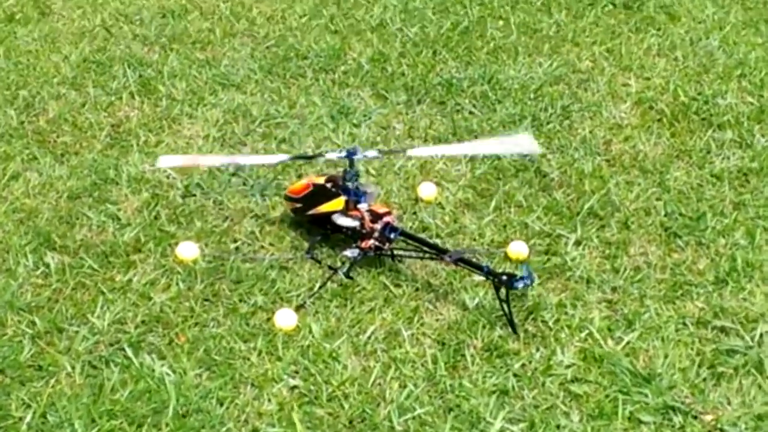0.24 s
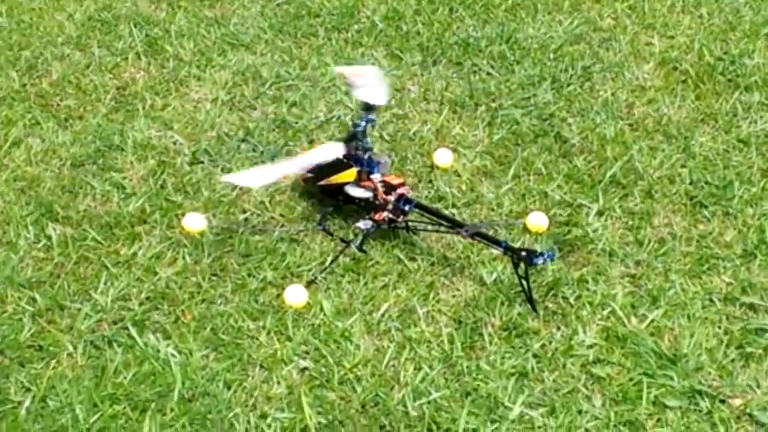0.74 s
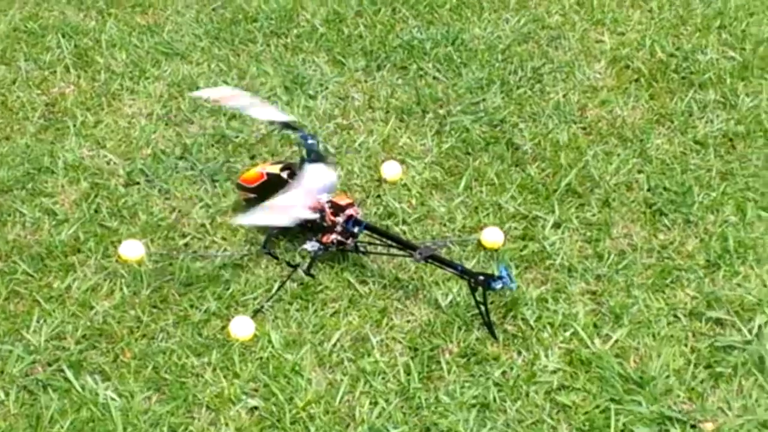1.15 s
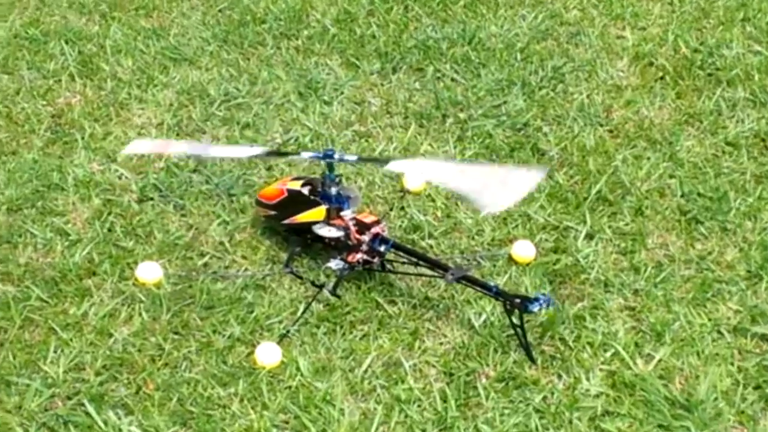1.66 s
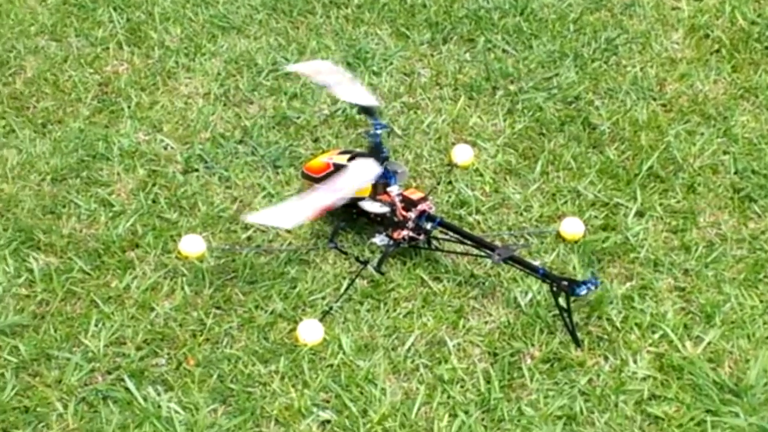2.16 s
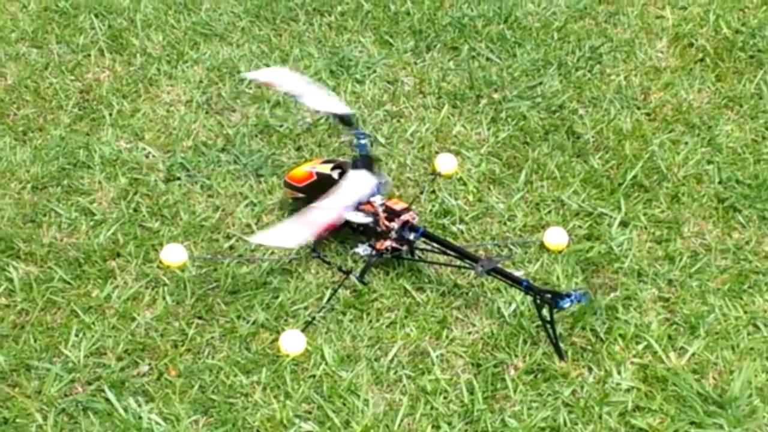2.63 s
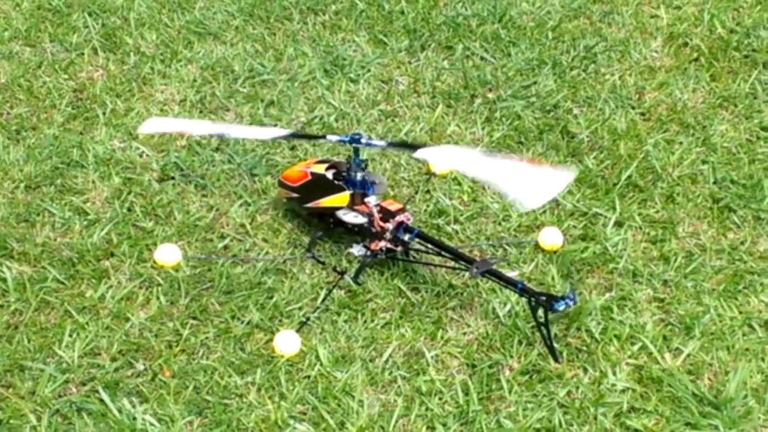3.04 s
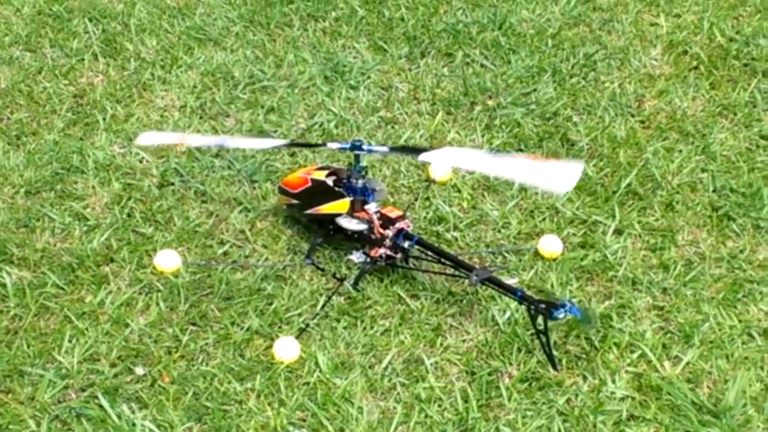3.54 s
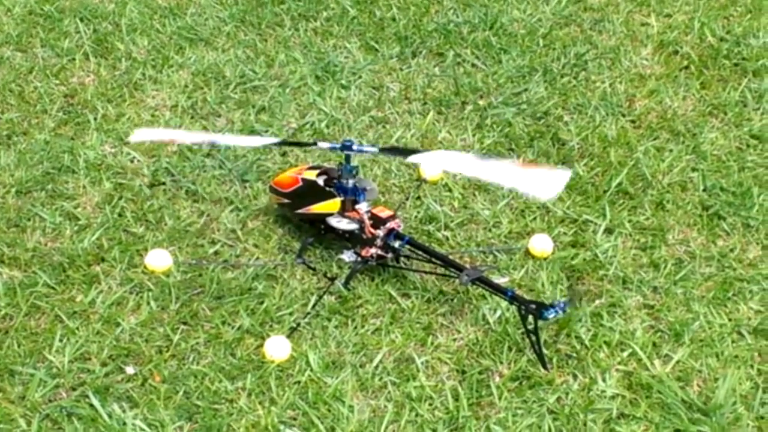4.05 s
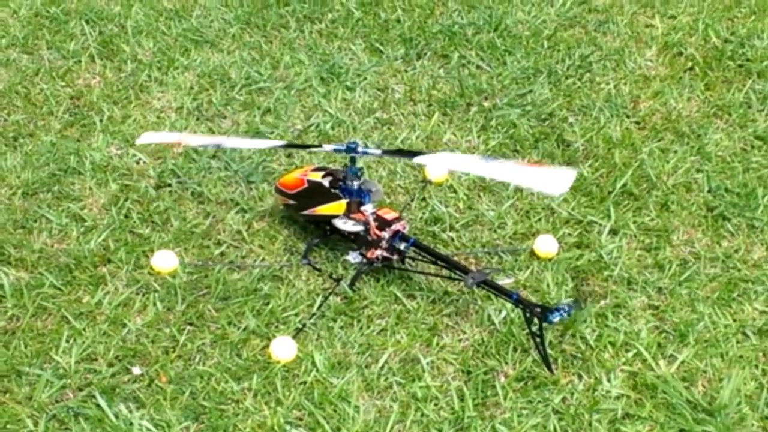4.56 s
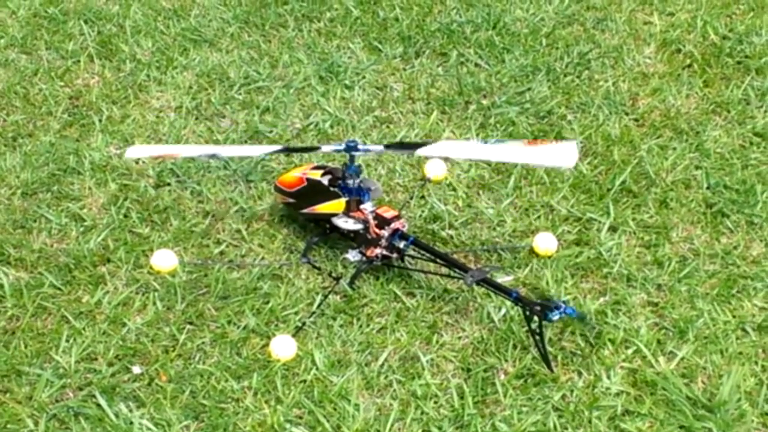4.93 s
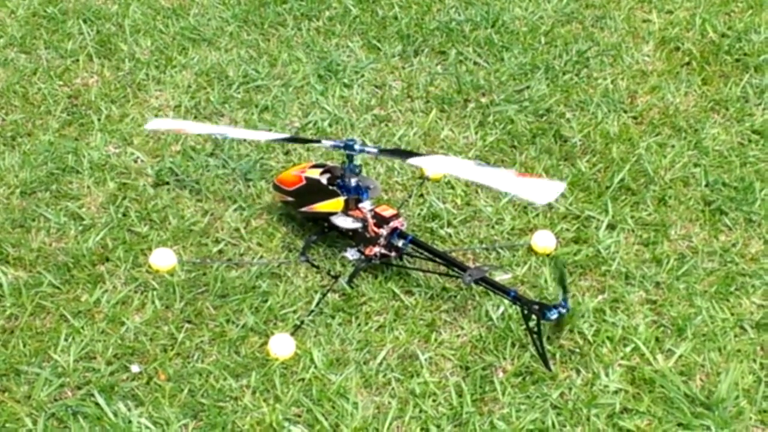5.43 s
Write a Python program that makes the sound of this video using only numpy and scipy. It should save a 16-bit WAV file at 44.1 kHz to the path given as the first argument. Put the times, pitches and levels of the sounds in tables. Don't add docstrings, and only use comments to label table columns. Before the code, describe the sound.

Close outdoors, a model helicopter winds down: piercing whine and hissing rattle, then loose gear knocks slowing to faint clicks over outdoor hush.

```python
import sys
import numpy as np
from scipy import signal
from scipy.fft import rfft, irfft, next_fast_len
from scipy.io import wavfile
from scipy.ndimage import uniform_filter1d, map_coordinates

SR = 44100
rng = np.random.default_rng(int(sys.argv[2]) if len(sys.argv) > 2 else 0)


def pcm_store(signal):
    levels = np.round(np.clip(np.atleast_2d(signal), -1, 1) * 32767)
    wavfile.write(sys.argv[1], SR, levels.astype(np.int16).T)


def level_to_linear(level):
    exponent = np.asarray(level, float) / 20
    return 10 ** exponent


N = 250796
TIME_S = np.arange(N) / SR
ROTOR = 13 / 150
LET_GO_S, SILENT_S = 2.6, 3.1


def unit(x):
    return x / np.sqrt(np.mean(x ** 2) + 1e-20)


def steady(x):
    power = uniform_filter1d((x ** 2).mean(0), size=7000)
    return x / np.sqrt(np.abs(power) + 1e-12)


def along(points, hz):
    f, v = np.transpose(points)
    return np.interp(np.log(hz + 1), np.log(f + 1), v)


def curves(rows):
    s, *cols = np.transpose(rows)
    return [np.interp(TIME_S, s, c) for c in cols]


def swells(rows):
    s, half, *db = np.transpose(rows)
    coarse = np.arange(0, N + 64, 32)
    bells = np.exp(-((coarse / SR - s[:, None]) / half[:, None]) ** 2)
    return [np.interp(np.arange(N), coarse, column @ bells) for column in db]


def wobble(rate):
    coarse = np.arange(0, N + 32, 16)
    knots = rng.standard_normal(int(N * rate / SR) + 4)
    return np.interp(np.arange(N), coarse, map_coordinates(knots, [coarse * rate / SR]))


def cycle(turns, per_turn, phase):
    return np.cos(2 * np.pi * per_turn * ROTOR * turns + phase)


def filtered(x, response):
    m = next_fast_len(N + 8192)
    return irfft(rfft(x, m) * response(np.fft.rfftfreq(m, 1 / SR)), m)[..., :N]


def band(hz, lo_hz, hi_hz):
    log_hz = np.log(hz + 1)
    below = np.logaddexp(0, 40 * (np.log(lo_hz) - log_hz))
    above = np.logaddexp(0, 40 * (log_hz - np.log(hi_hz)))
    return level_to_linear(-4.343 * (below + above))


def patchy(patchy_db, size=6):
    z = signal.stft(rng.standard_normal((2, N + 512)), nperseg=512)[2]
    field = uniform_filter1d(rng.standard_normal(z.shape[1:]), size=size, axis=0)
    field = uniform_filter1d(field, size=12, axis=1)
    return signal.istft(z * level_to_linear(patchy_db * unit(field)), nperseg=512)[1][:, :N]


# [freq_hz, likeness_0_1]
ALIKE = [(60, 0.71), (250, 0.99), (700, 0.95), (1400, 0.81), (2800, 0.63), (4500, 0.31), (6500, 0.68),
         (9500, 0.8), (13000, 0.24)]
# [freq_hz, left_minus_right_db]
TILT = [(60, -5), (110, 0), (200, -1.5), (380, -2), (700, -2.5), (1290, 0.5), (2380, -0.5), (4400, 2.5),
        (8120, 2.5), (15000, -0.5)]


def stereo(pair, colour):
    m = next_fast_len(N + 8192)
    hz = np.fft.rfftfreq(m, 1 / SR)
    turn = np.arccos(along(ALIKE, hz)) / 2
    mid, side = rfft(pair, m) * colour(hz) * [np.cos(turn), np.sin(turn)]
    balance = level_to_linear(np.outer([.5, -.5], along(TILT, hz)))
    out = irfft([mid + side, mid - side] * balance, m)[:, :N]
    return out / np.std(out.mean(0))


# [time_s, speed_turns_per_s]
SPEED = [(0, 380.8), (.2, 378), (.6, 373.3), (1.2, 367), (1.4, 364.5), (1.6, 360.5), (1.8, 355.8),
         (2, 348.7), (2.6, 326.9), (2.8, 318.3), (3.07, 305), (3.3, 278), (3.78, 241), (4.75, 185),
         (5.05, 165), (5.7, 98)]


def shaft():
    return np.cumsum(curves(SPEED)[0]) / SR


# [time_s, level_db, left_minus_right_db, left_lead_rad]
WHINE = [(0, -34.4, 4.5, .5), (.3, -29.9, 5.3, .45), (.85, -29.8, 5.3, .75), (1.2, -28.6, 7.5, .7),
         (1.35, -30.1, 14.5, .85), (1.55, -32.3, 12, 1.55), (1.8, -34.4, 10, 1.62), (1.97, -40, 7.5, 1.62),
         (2.15, -52, 3.5, 1.5), (2.35, -45, 2, 1), (2.85, -49, 0, .8), (3.2, -95, 0, .8)]


def whine(turns):
    db, pan_db, lead_rad = curves(WHINE)
    depth = .51 + .07 * wobble(6)
    swell = 1 + depth * cycle(turns, 1, -2.1 + .45 * wobble(25)) + .1 * cycle(turns, 2, 1.8)
    phase = 2 * np.pi * 13 * turns + .2 * wobble(40) + .25 * wobble(300)
    flutter = level_to_linear(.4 * wobble(14) + 1.2 * wobble(110))
    side = np.array([[.5], [-.5]])
    pair = level_to_linear(side * pan_db) * np.exp(1j * side * lead_rad)
    pair = pair / np.abs(pair.mean(0))
    return np.sqrt(2) * level_to_linear(db + 0.7) * flutter * swell * np.imag(pair * np.exp(1j * phase))


# [freq_hz, width_hz, gain_db]
LIFTS = [(590, 11, 17), (710, 40, 5), (875, 30, 6), (4790, 170, 17), (950, 90, 7), (2930, 250, 4),
         (5860, 200, 5), (6430, 200, 9)]


def lift(hz):
    grid = np.arange(0, 12000, 2.)
    gain = 1 + sum((level_to_linear(2 * db) - 1) / (1 + ((grid - c) * 2 / w) ** 4) for c, w, db in LIFTS)
    return np.interp(hz, grid, 10 * np.log10(gain))


# [multiple_of_shaft_speed, start_level_db, slope_db_per_s]
TONES = [(.347, -67, 0), (.433, -57, -1), (.52, -61, -1), (.607, -68, 3.8), (.693, -64, 0),
         (.735, -54.5, 0), (1.47, -52, -2), (1.56, -63, 3), (2, -66, 4), (2.37, -59, -1.5), (3.02, -62, 1),
         (4, -49.5, -2), (4.04, -54, -.5), (4.16, -61, .7), (8, -45.5, 0), (9.19, -33, -11), (14, -56, 1.5),
         (18, -57, .5), (30, -39, -24)]


def tones(turns):
    rotor_lasts_s, gone_db = .45, -72
    out, n = np.zeros((2, N)), int((SILENT_S + rotor_lasts_s) * SR)
    t, speed, turns = TIME_S[:n], curves(SPEED)[0][:n], turns[:n]
    beat_db = 2.5 * cycle(turns, 1, -1)
    for multiple, db, db_per_s in TONES:
        fade_s = SILENT_S + rotor_lasts_s * (multiple < 1) - LET_GO_S
        gone = np.clip((t - LET_GO_S) / fade_s, 0, 1)
        driven_db = db + db_per_s * t + lift(multiple * speed) + beat_db * (multiple > 3.5)
        waver_db = (1.6 + 1.6 * (multiple < 3.5)) * wobble(14)[:n]
        level = (gone < 1) * level_to_linear(driven_db + gone * (gone_db - driven_db) + waver_db)
        jitter = (.3 + .4 * (multiple < 4.1)) * wobble(25)[:n]
        phase = 2 * np.pi * (multiple * turns + rng.random()) + jitter
        lead = 0.13 * multiple ** .5 * rng.normal(size=2)[:, None]
        out[:, :n] += np.sqrt(2) * level * level_to_linear(2.8 * lead) * np.sin(phase + lead)
    return out


# [time_s, level_db]
COAST = [(3.8, -90), (4.2, -75), (5, -78), (5.3, -74), (5.45, -74), (5.6, -90)]


def coast(turns):
    level = level_to_linear(curves(COAST)[0] + 2.5 * wobble(12))
    return np.sqrt(2) * level * np.sin(2 * np.pi * 8 * turns + .4 * wobble(25))


def ticking(turns):
    speed = curves(SPEED)[0]
    per_s = speed * (.6 + 2.5 * (speed / 380) ** 4)
    count = np.cumsum(per_s * level_to_linear(1.8 * wobble(90))) / SR
    at = np.flatnonzero(np.diff(np.floor(count)))
    hits = np.zeros(N)
    hits[at] = level_to_linear(2.2 * rng.standard_normal(len(at)) + cycle(turns[at], 1, .2))
    return hits


def binding(turns):
    bind_s, free_s, width_turns, swell_db = 3.215, 4.4, 0.5, 2
    away = (ROTOR * (turns - turns[round(bind_s * SR)]) + .5) % 1 - .5
    touching = (TIME_S > bind_s - .02) * (TIME_S < free_s)
    return swell_db * (np.exp(-(away / width_turns) ** 2) - .5) * touching


# [time_s, rattle_db, backlash_0_1, wash_db]
DRIVE = [(0, -33, 0.02, -45), (.12, -34.5, 0, -44.5), (.6, -36.5, 0, -46), (1.2, -35, 0.29, -47.5),
         (1.6, -32, 0.24, -43), (2.1, -30, 0.48, -43), (2.45, -28.5, 0.6, -45), (2.75, -32, 0.32, -44.5),
         (3.0, -32.5, 0.45, -46), (3.38, -42.5, 0.35, -48), (3.63, -40, 0.55, -45.5),
         (3.85, -45, 0.53, -53), (4.05, -49.5, 0.62, -57), (4.38, -50, 0.49, -61),
         (4.75, -54.5, 0.58, -65.5), (5.3, -65, 0.6, -62), (5.69, -64.5, 0, -62.5)]
# [time_s, half_length_s, rattle_swell_db, tip_hiss_swell_db]
JOLTS = [(.9, 0.22, 3, 4.5), (1.27, 0.031, 1.5, 4), (1.57, 0.049, 0.5, 3), (1.93, 0.076, 1.5, 4),
         (2.12, 0.045, 0, 5), (2.85, 0.088, 0.5, -3), (3.41, 0.022, -0.5, -14), (3.658, 0.038, -5.5, -6),
         (3.705, 0.061, 2.5, 4), (3.768, .012, -3, 0), (3.785, 0.01, 5, 3), (4.09, 0.019, -5.5, -9),
         (4.13, .02, 0, 7), (4.26, 0.0097, -7, -7), (4.424, 0.086, 1.5, 7.5), (4.556, 0.0053, 6, 13),
         (4.689, 0.034, 7, 4), (5.13, 0.068, 2.5, 7)]
# [time_s, half_length_s, low_part_db, high_part_db, high_hum_db]
BUZZ = [
    (3.58, 0.22, 3, -1, -4.5),
    (1.06, 1, -1, 3, 2.5),
    (2.78, .25, -3, 2, 2),
]
# [freq_hz, density_db_per_hz]
FRAME = [(1940, -59), (3300, -31), (3430, -42), (3590, -10.5), (3760, -13), (4400, -5.5), (5840, -3),
         (6400, 6.5), (6970, 9), (8320, 1.5), (9300, 7), (10600, 4.5), (11300, 1), (13700, 0), (15800, 7)]
# [freq_hz, density_db_per_hz]
BODY = [(680, -12), (1150, 8), (1270, 1.5), (1590, 1), (2170, 6.5), (2380, 1), (2730, 16), (3060, 13),
        (3330, 11.5), (3500, 22.5), (4550, -44), (7700, -120)]
# [freq_hz, width_hz, gain_db]
RINGS = [(4810, 130, 11.5), (5860, 330, 4.5), (6450, 350, 2), (6900, 330, 5.5), (7460, 330, -1)]


def rattle(turns):
    db, loose, _ = curves(DRIVE)
    jolt_db = swells(JOLTS)[0]
    buzz_low_db, buzz_high_db, _ = swells(BUZZ)
    top_db = -6 - 2.9 * loose + 0.032 * jolt_db
    canopy_db = -9.5 - 12.2 * loose + 0.032 * jolt_db
    middle_db = -7 - 8.5 * loose + 0.032 * jolt_db
    db = db + 0.62 * wobble(9.74) + binding(turns) + jolt_db
    tick_share = np.clip(1.25 - curves(SPEED)[0] / 400, .3, .7)
    hits, t = ticking(turns), TIME_S[:400]
    burst = (1 - np.exp(-t / 0.00029)) * np.exp(-t / 0.0028)
    bursts = unit(signal.fftconvolve(hits, burst)[:N])
    turning = level_to_linear(.7 * cycle(turns, 1, .2) + .5 * cycle(turns, 2, 1.6))
    push = np.sqrt(1 - tick_share) * turning + 0.94 * np.sqrt(tick_share) * bursts
    drive = steady(patchy(patchy_db=1.34) * push)
    parts = [(FRAME, 5250, 8300, 0), (FRAME, 8300, 11300, top_db), (FRAME, 3450, 5250, middle_db + 4),
             (BODY, 1200, 2450, canopy_db + buzz_low_db), (BODY, 2450, 3450, canopy_db + buzz_high_db)]
    hiss = []
    for shape, lo_hz, hi_hz, rel_db in parts:
        noise = stereo(drive, lambda hz: level_to_linear(along(shape, hz)) * band(hz, lo_hz, hi_hz))
        hiss.append(level_to_linear(db + rel_db + 0.037 * wobble(4.1)) * noise)
    rung = np.zeros(N)
    for c, w, gain_db in RINGS:
        blows = hits * level_to_linear(4.6 * rng.standard_normal(N))
        rung += filtered(blows, lambda f: level_to_linear(gain_db) * 1j * f * w / (c * c - f * f + 1j * f * w))
    rung = steady(filtered(rung, lambda hz: band(hz, 5080, 6530))[None]) * level_to_linear([[1], [-1]])
    chatter_db = -0.5 * np.clip((TIME_S - SILENT_S) / 0.11, 0, 1)
    ticks = np.sqrt(tick_share) * level_to_linear(db + chatter_db) * rung
    return sum(hiss[1:]) + np.sqrt(1 - tick_share) * hiss[0] + ticks


# [start_s, peak_db, ring_hz]
KNOCKS = [(3.1043, -25, 5450), (3.1302, -29, 7000), (3.1402, -32, 6660), (3.1438, -27, 6100),
          (3.1748, -28, 6060), (3.1788, -20, 5900), (3.1981, -20, 5540), (3.2048, -25, 5500),
          (3.2084, -34, 6930), (3.2175, -27, 6000), (3.2619, -25, 5500), (3.3029, -28, 5640),
          (3.3101, -27, 5130), (3.3324, -38, 6900), (3.3363, -22, 6170), (3.3412, -21, 5700),
          (3.3447, -25, 5900), (3.3797, -36, 5920), (3.3862, -26, 5340), (3.4276, -23, 5370),
          (3.4323, -25, 5940), (3.4389, -35, 5990), (3.4653, -30, 5900), (3.4729, -30, 6400),
          (3.4968, -26, 6360), (3.5087, -36, 5100), (3.5148, -32, 5140), (3.5397, -45, 6800),
          (3.5446, -27, 6800), (3.5519, -36, 6500), (3.5557, -28, 6000), (3.5611, -31, 6300),
          (3.5741, -31, 6700), (3.5841, -29, 6470), (3.597, -33, 6700), (3.6027, -33, 6550),
          (3.6196, -26, 5960), (3.6445, -28, 5800), (3.6508, -32, 6500), (3.6827, -18, 6060),
          (3.6906, -24, 5800), (3.6953, -19, 5380), (3.6997, -33, 5400), (3.7067, -27, 5900),
          (3.7339, -29, 6300), (3.7375, -32, 5800), (3.7438, -39, 5190), (3.7476, -33, 5760),
          (3.7779, -31, 5990), (3.7838, -22, 5760), (3.789, -28, 5550), (3.793, -25, 6000),
          (3.8375, -32, 5900), (3.849, -30, 7000), (3.8845, -29, 6010), (3.8913, -39, 6250),
          (3.9319, -31, 5760), (3.9599, -39, 6040), (3.9846, -30, 5960), (4.0257, -41, 6240)]
# [start_s, peak_db, ring_hz]
LATE_KNOCKS = [(4.0897, -34, 5200), (4.115, -34, 6600), (4.1409, -36, 5860), (4.197, -35, 6650),
               (4.2049, -35, 5200), (4.2593, -40, 4900), (4.2653, -36, 4730), (4.274, -46, 6400),
               (4.3095, -39, 6700), (4.3151, -30, 6090), (4.3367, -31, 6650), (4.3483, -36, 5500),
               (4.3642, -35, 6550), (4.3736, -31, 6270), (4.38, -34, 6910), (4.3986, -35, 6840),
               (4.4177, -31, 6700), (4.4244, -38, 6100), (4.4316, -32, 6150), (4.4413, -41, 6240),
               (4.4586, -43, 6570), (4.4633, -36, 6850), (4.4773, -33, 6420), (4.536, -43, 7040),
               (4.5462, -42, 7100), (4.5563, -46, 6910), (4.5765, -35, 6950), (4.628, -34, 6730),
               (4.6354, -40, 6700), (4.6416, -34, 6700), (4.6737, -30, 6960), (4.6831, -33, 6960),
               (4.6876, -39, 4970), (4.6927, -43, 5300), (4.7207, -33, 6840), (4.7423, -35, 6850),
               (4.7541, -41, 6910), (4.7826, -42, 6900), (4.8043, -37, 7000), (4.8101, -43, 6000),
               (4.8287, -46, 6900), (4.8547, -44, 4900), (4.8652, -43, 5950), (4.8879, -46, 5900),
               (4.9281, -38, 6060), (4.9662, -39, 6000), (4.9755, -40, 6940), (4.989, -41, 6100),
               (5.0043, -46, 6590), (5.0161, -46, 6870), (5.0254, -54, 5960), (5.0862, -38, 6300),
               (5.109, -42, 6440), (5.1164, -42, 6500), (5.1406, -42, 7020), (5.1722, -46, 6440),
               (5.216, -45, 5500), (5.2312, -43, 6660), (5.2429, -43, 6400), (5.339, -44, 6440)]
# [start_s, peak_db, ring_hz]
CLUNKS = [(3.103, -32, 4590), (3.1751, -33, 4670), (3.2194, -38, 4170), (3.2697, -37, 4300),
          (3.3084, -32, 4630), (3.3441, -26, 4630), (3.4326, -29, 4500), (3.5002, -39, 3860),
          (3.557, -37, 4420), (3.602, -36, 4140), (3.7004, -47, 4500), (3.7392, -39, 4430),
          (3.7921, -42, 4460), (3.8419, -38, 4530), (3.939, -36, 4230), (4.0402, -43, 4570),
          (4.0438, -44, 4030), (4.1466, -40, 4470), (4.2612, -40.5, 2180), (4.2669, -39, 3720),
          (4.3155, -37, 3800), (4.5562, -37, 3850), (4.5605, -41, 3980), (4.6147, -43, 4140),
          (4.6854, -31, 3630), (4.6889, -44, 4500), (4.6938, -47, 4460), (4.7001, -44, 3830),
          (4.7466, -39, 4040), (4.2635, -41, 600), (4.553, -46, 880), (4.682, -50, 2340),
          (4.696, -53, 2200), (3.819, -49, 2080), (3.8409, -38, 2780), (5.0199, -44, 3960)]


def knocks():
    out, t = np.zeros((2, N + 600)), np.arange(600) / SR
    fizz = signal.butter(2, [7800, 12500], "band", fs=SR)
    crack = signal.butter(2, [1900, 6000], "band", fs=SR)
    # events, t60_s, noise band, noise_db, boost_db
    kinds = [(KNOCKS, 0.013, fizz, -10, 3), (LATE_KNOCKS, 0.013, fizz, -9, 3), (CLUNKS, 0.033, crack, -9, -1)]
    for rows, t60_s, edge, edge_db, boost_db in kinds:
        shape = (1 - np.exp(-t / 0.0013)) * level_to_linear(-60 * t / t60_s)
        for s, db, hz in rows:
            a, b = rng.standard_normal((2, 600))
            ring = np.sin(2 * np.pi * hz * t + 0.15 * np.cumsum(a))
            ring += 0.12 * np.sin(2 * np.pi * (12700 - hz) * t)
            burst = (ring + level_to_linear(edge_db) * unit(signal.lfilter(*edge, b))) * shape
            out[:, round(s * SR):][:, :600] += level_to_linear(db + boost_db) * burst * level_to_linear([[1.6], [-1.6]])
    return out[:, :N]


# [time_s, half_length_s, swell_db]
GUSTS = [(.26, 0.046, 8.5), (.6, 0.26, -3), (1.0, 0.12, 3), (1.5, 0.017, 4), (2.08, 0.14, 4.5),
         (2.28, 0.063, 5.5), (2.55, 0.049, 7.5), (2.97, 0.048, 7), (3.2, 0.068, 4.5), (3.62, 0.06, 8.5),
         (3.75, 0.018, 3), (4.29, 0.07, 5), (5.52, 0.054, -2)]
# [freq_hz, density_db_per_hz]
AIR = [(24, -61), (40, -11), (108, -9), (177, -5.5), (236, -0.5), (312, -4), (430, -7), (504, -0.5),
       (665, 0), (758, -7), (944, 4), (1110, -3.5), (1300, -15), (1690, -12), (2860, -120)]


def wash(turns):
    db = curves(DRIVE)[2] + 0.88 * swells(JOLTS)[0]
    low_db = -6 + 1.5 * wobble(6)
    hum_db = 0.39 * wobble(6.3) + swells(GUSTS)[0]
    high_db = -0.5 + swells(BUZZ)[2] + 3 * wobble(8.5) + 0.3 * lift(3 * curves(SPEED)[0])
    air = patchy(patchy_db=2.5, size=2) * level_to_linear(2.8 * cycle(turns, 2, 0))
    out = np.zeros((2, N))
    for lo_hz, hi_hz, rel_db in [(20, 400, low_db), (400, 780, hum_db), (780, 1300, high_db)]:
        noise = stereo(air, lambda hz: level_to_linear(along(AIR, hz)) * band(hz, lo_hz, hi_hz))
        out += level_to_linear(db + rel_db - 3.5) * noise
    return out


def tips(turns):
    beat = level_to_linear(0.88 * cycle(turns, 2, 3.0) + 0.13 * wobble(2.5))
    db, loose, _ = curves(DRIVE)
    level = level_to_linear(db - 1.56 - 15 * loose + swells(JOLTS)[1])
    air = patchy(patchy_db=3.0) * beat
    return level * stereo(air, lambda hz: level_to_linear(along(FRAME, hz)) * band(hz, 10500, 14600))


def slap(turns):
    overtones = np.exp(2j * np.pi * rng.random(257)) * (np.arange(257) < 40)
    pattern = np.interp(ROTOR * turns % 1 * 512, np.arange(512), irfft(overtones), period=512)
    coloured = unit(filtered(pattern, lambda hz: level_to_linear(along(AIR, hz)) * band(hz, 87, 1500)))
    return level_to_linear(curves(DRIVE)[2] - 9 + 5.4 * wobble(5.63)) * coloured


# [freq_hz, level_db]
FAR_HUM = [(75.7, -75), (99.3, -72)]
# [time_s, change_db]
HUM_RECEDES = [(3, 0), (4, -9), (4.9, -9), (5.2, -5), (5.7, -7)]


def far_hum():
    out = np.zeros(N)
    for hz, db in FAR_HUM:
        makeup_db = 20 * np.log10(1 + (70 / hz) ** 2)
        level = level_to_linear(db + curves(HUM_RECEDES)[0] + 3 * wobble(5) + makeup_db)
        out += np.sqrt(2) * level * np.sin(2 * np.pi * hz * TIME_S + .3 * wobble(5))
    return out


# [freq_hz, density_db_per_hz]
LAWN = [(38, -37), (65, 11), (365, 6.5), (591, -5), (743, -39), (873, 0), (1380, 3.5), (2090, 12),
        (3160, 0), (5010, 5), (6600, 3.5), (15800, -45)]
# [time_s, change_db]
QUIETENS = [(5, 0), (5.5, -3.5)]


def lawn():
    level = level_to_linear(-59.0 + 0.087 * wobble(1.7) + curves(QUIETENS)[0])
    return level * stereo(patchy(patchy_db=2.2), lambda hz: level_to_linear(along(LAWN, hz)))


def scene():
    turns = shaft()
    motor = whine(turns) + tones(turns) + coast(turns)
    gears = rattle(turns) + knocks()
    rotor = wash(turns) + tips(turns) + slap(turns)
    return motor + gears + rotor + far_hum() + lawn()


# [freq_hz, width_hz, depth_0_1]
NOTCHES = [(3435, 300, .92), (8300, 350, .7), (11350, 300, .6)]


def housing(hz):
    dips = np.prod([1 - depth / (1 + ((hz - c) * 2 / w) ** 2) for c, w, depth in NOTCHES], axis=0)
    return dips * (1j * hz / (70 + 1j * hz)) ** 2


def self_noise():
    noise = rng.standard_normal((2, N))
    hiss = stereo(noise, lambda hz: level_to_linear(along(LAWN, hz)) * band(hz, 3240, 15900))
    return level_to_linear(-59 + curves(QUIETENS)[0]) * hiss


def low_pass(x):
    return signal.sosfilt(signal.butter(12, 15925, fs=SR, output="sos"), x)


def record(dry):
    mix = filtered(dry, housing) + self_noise() - .0011
    return low_pass(mix)


dry = scene()
out = record(dry)
pcm_store(out)
```